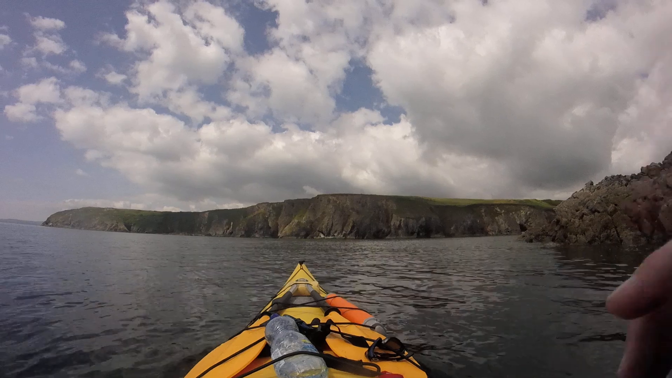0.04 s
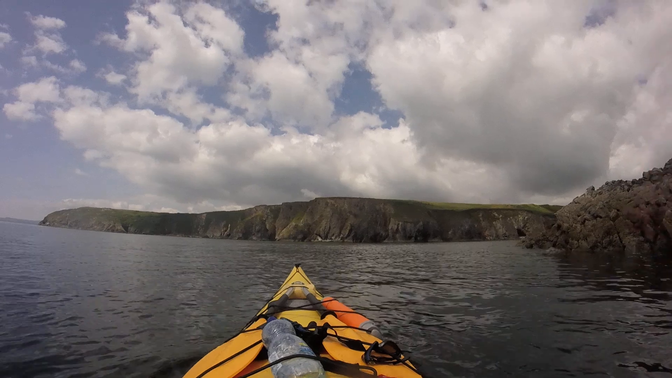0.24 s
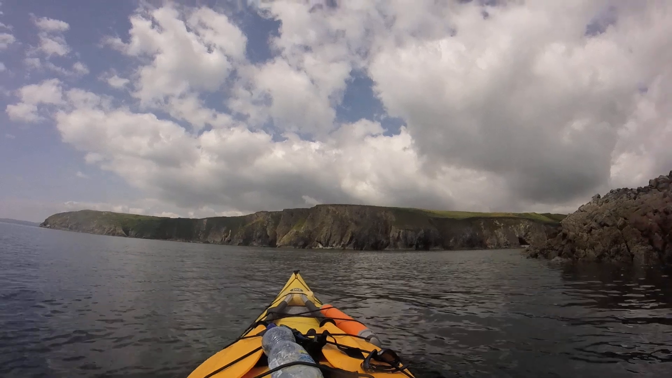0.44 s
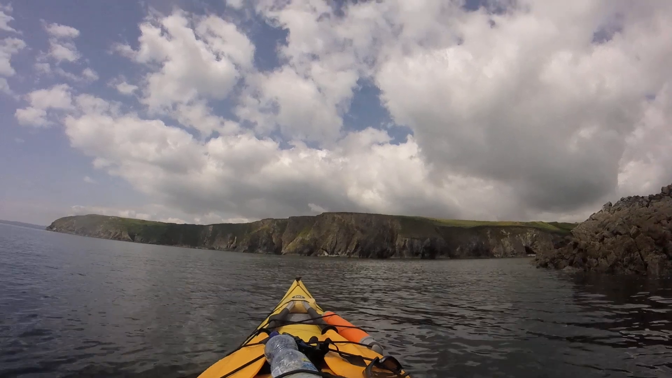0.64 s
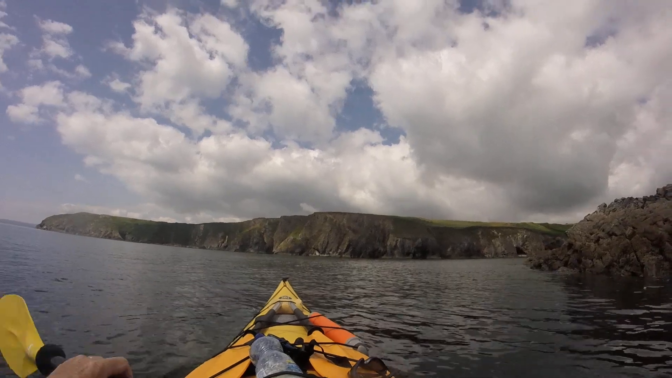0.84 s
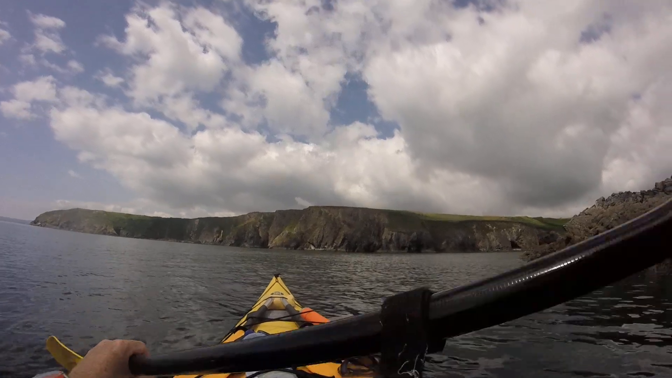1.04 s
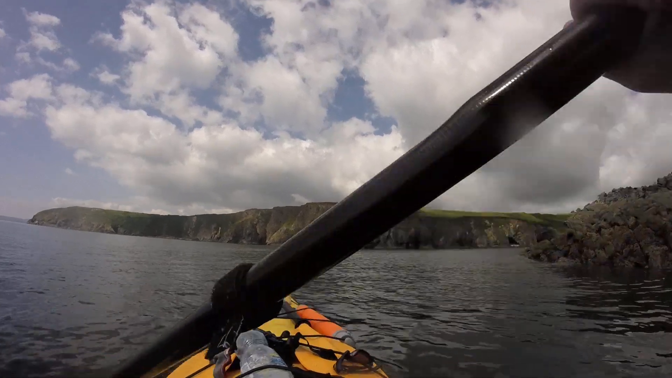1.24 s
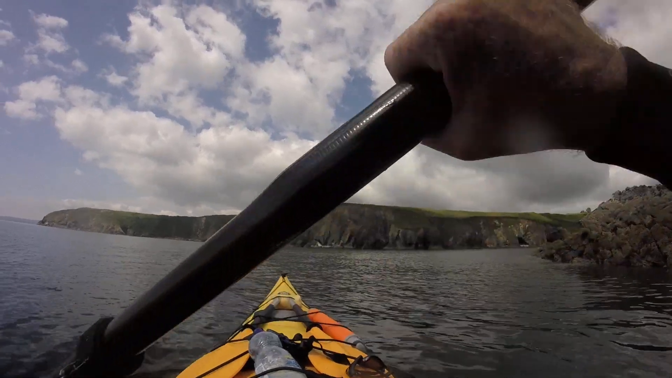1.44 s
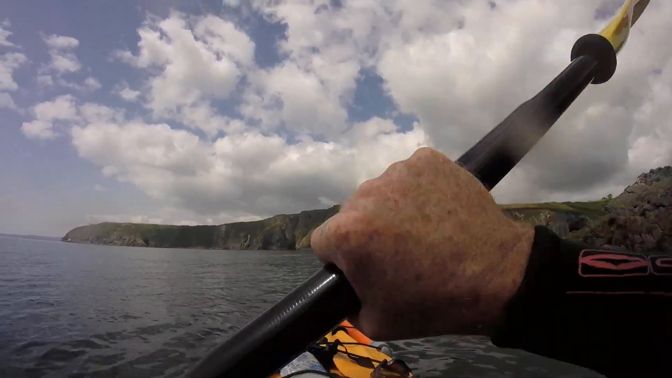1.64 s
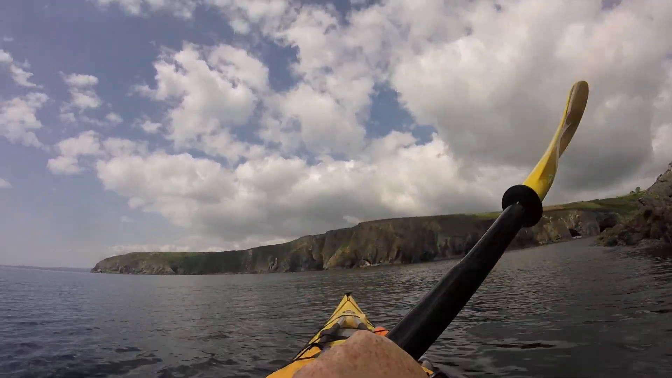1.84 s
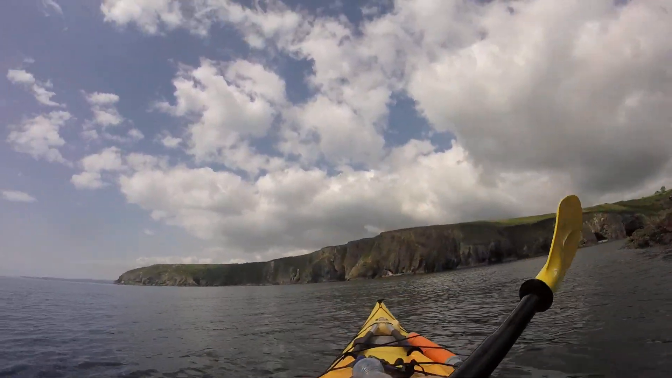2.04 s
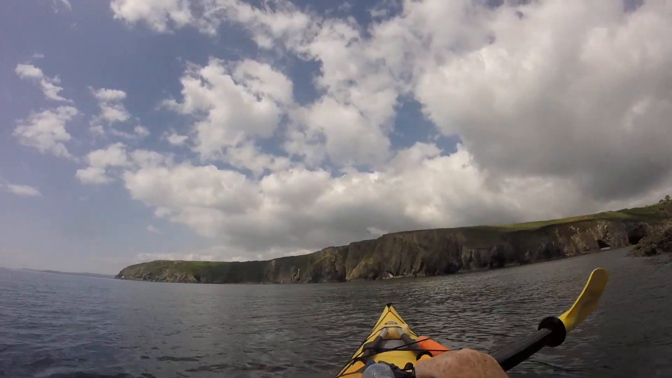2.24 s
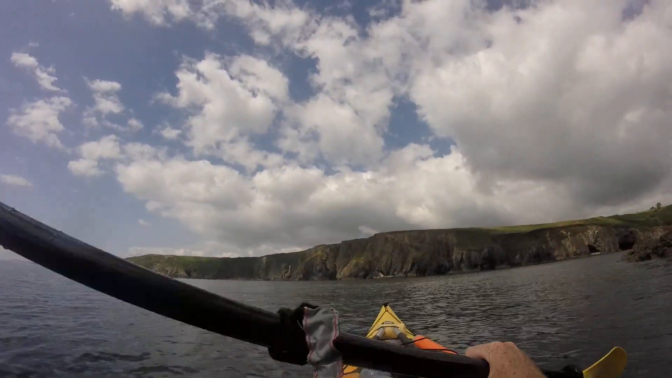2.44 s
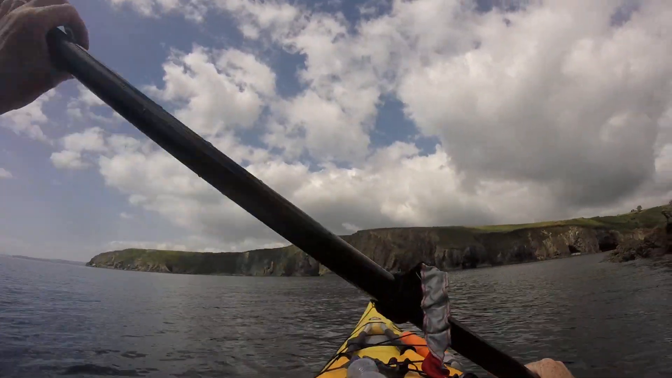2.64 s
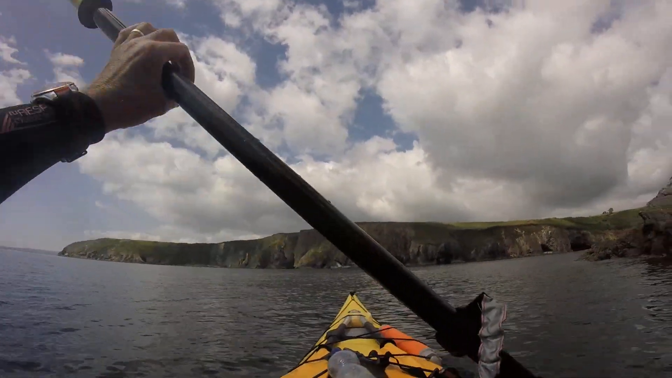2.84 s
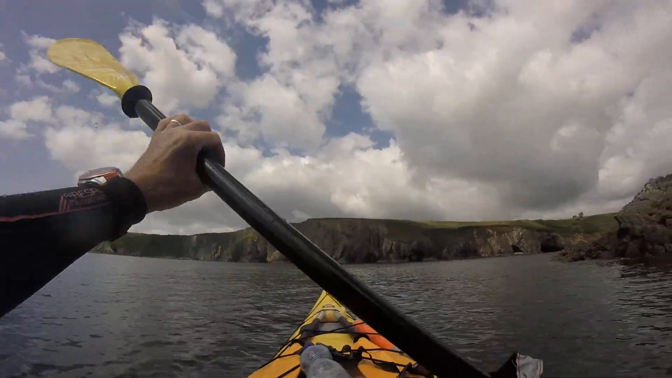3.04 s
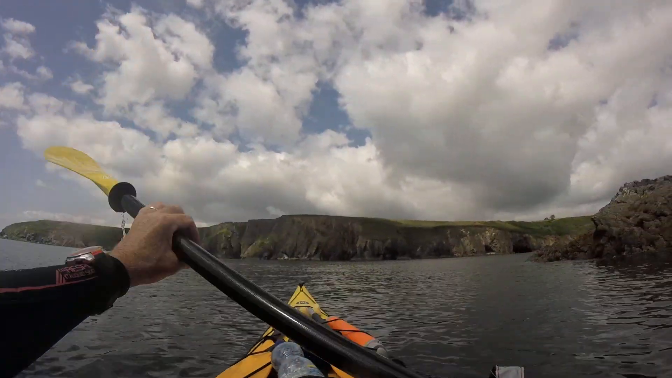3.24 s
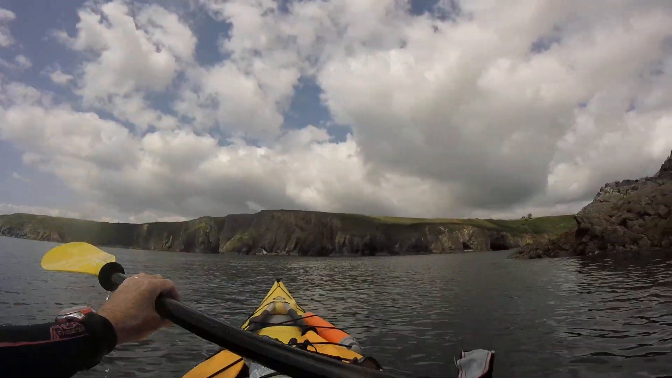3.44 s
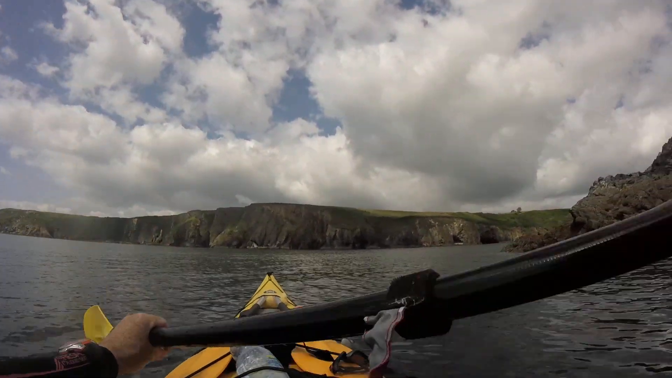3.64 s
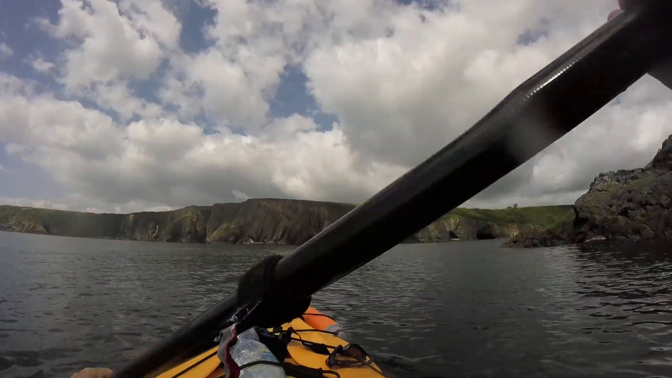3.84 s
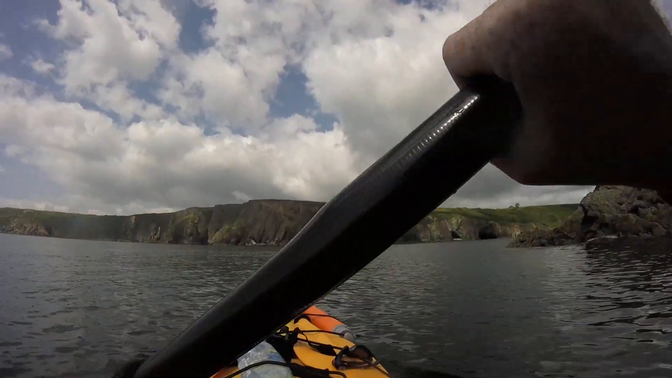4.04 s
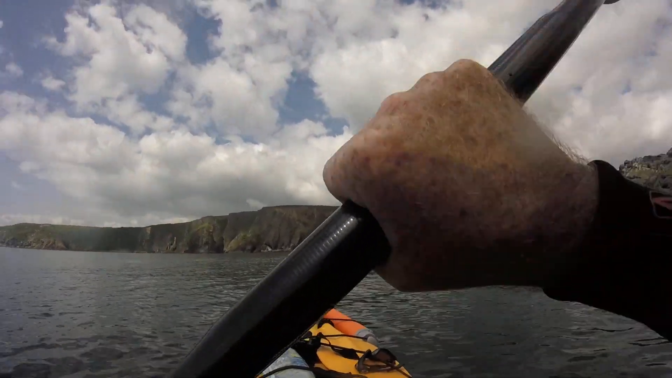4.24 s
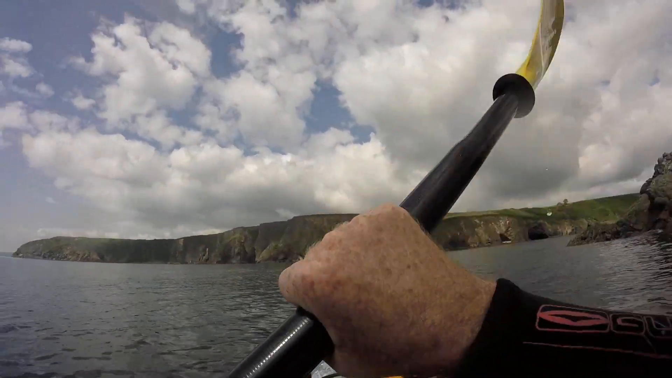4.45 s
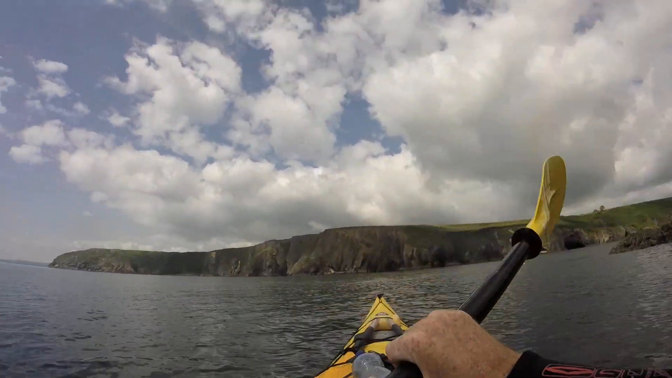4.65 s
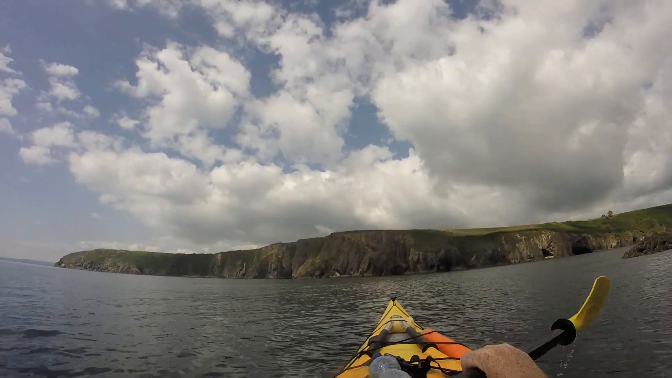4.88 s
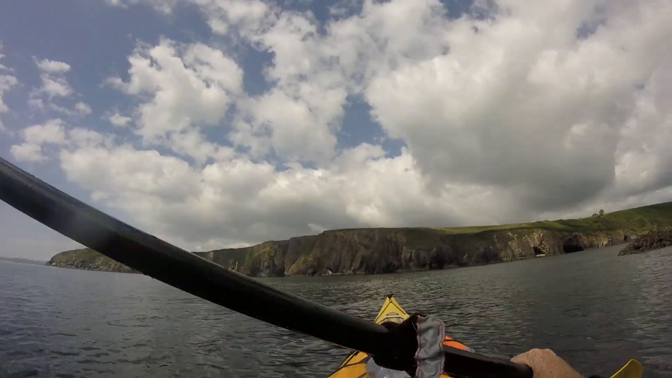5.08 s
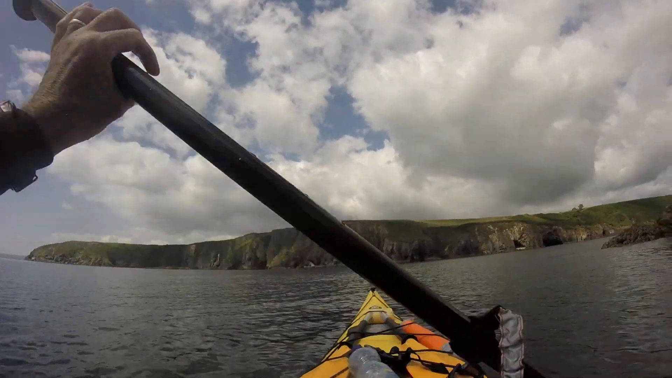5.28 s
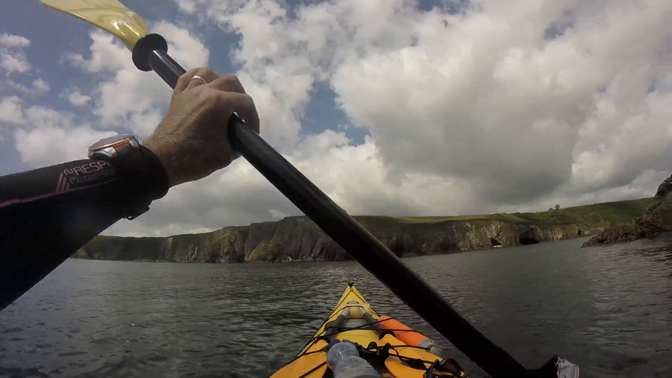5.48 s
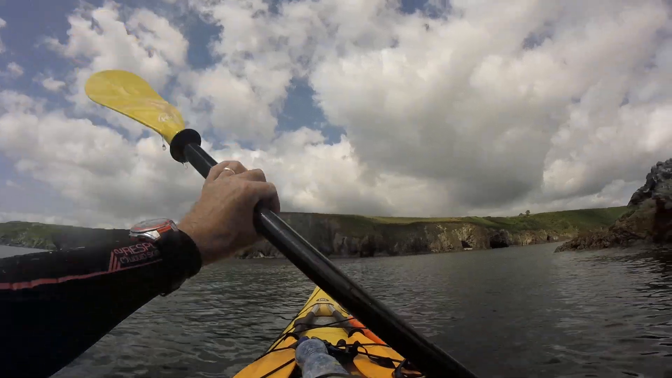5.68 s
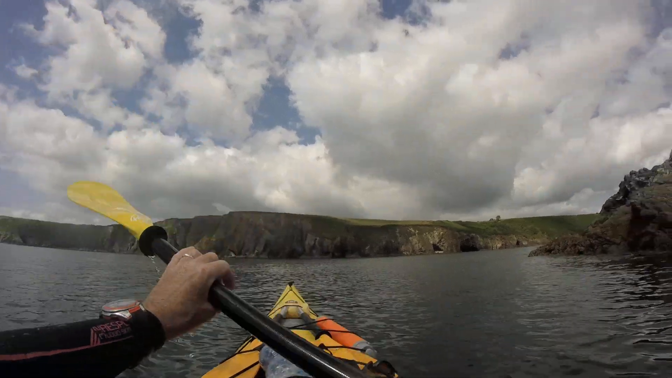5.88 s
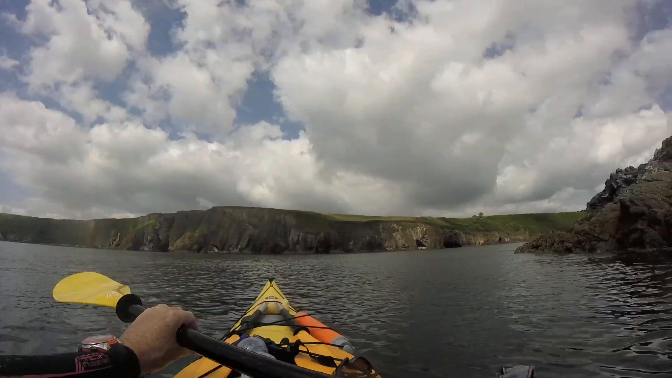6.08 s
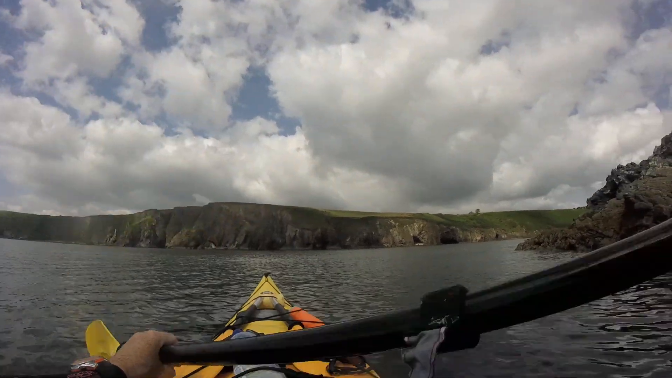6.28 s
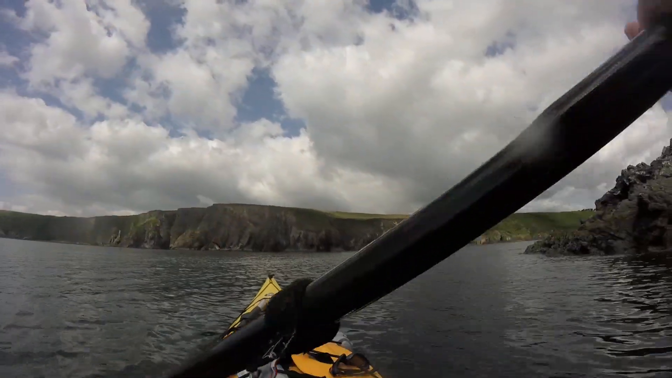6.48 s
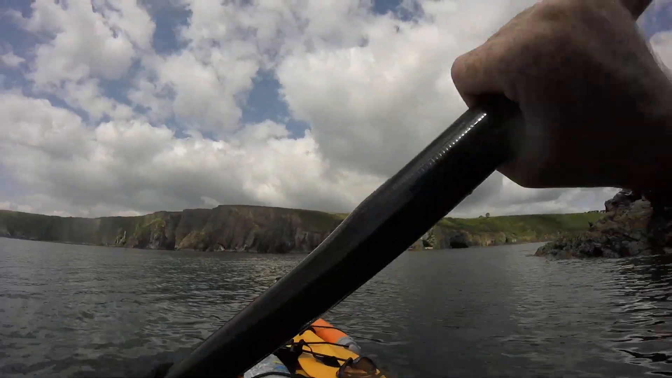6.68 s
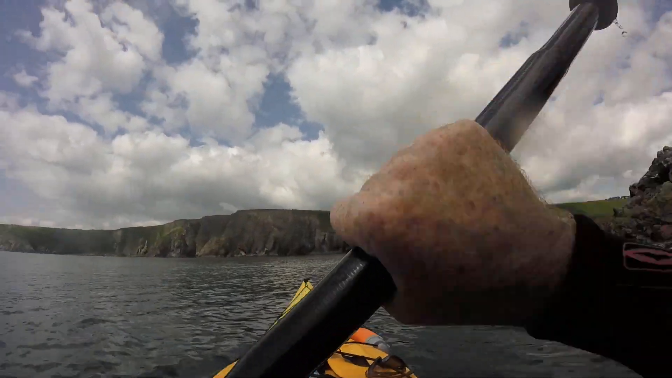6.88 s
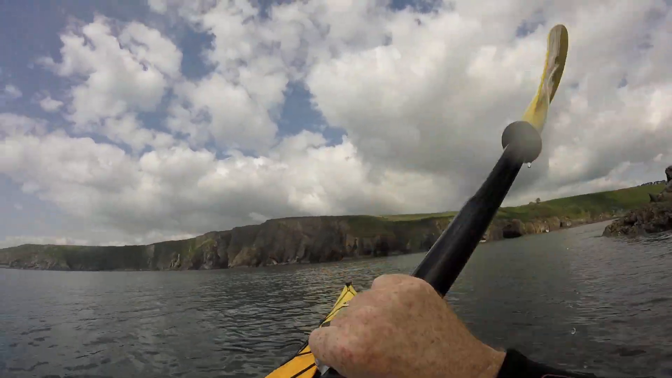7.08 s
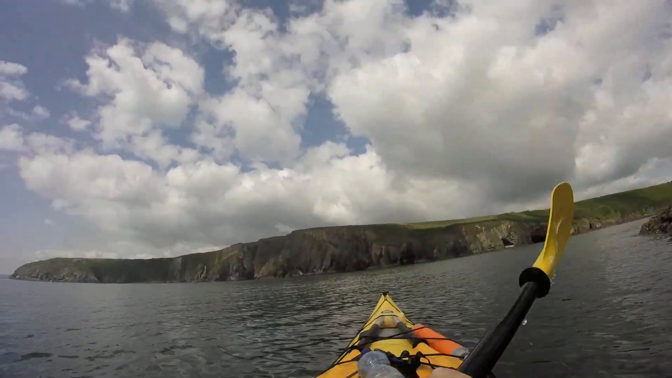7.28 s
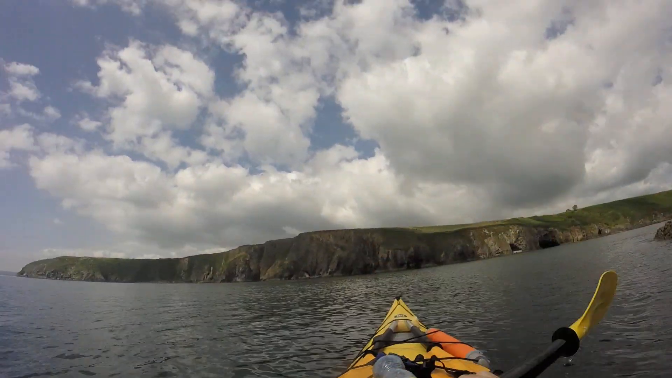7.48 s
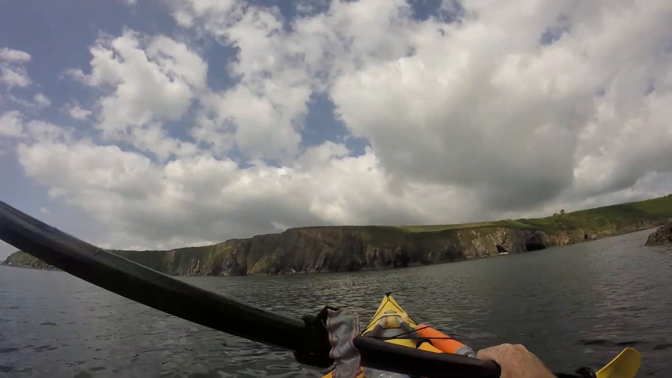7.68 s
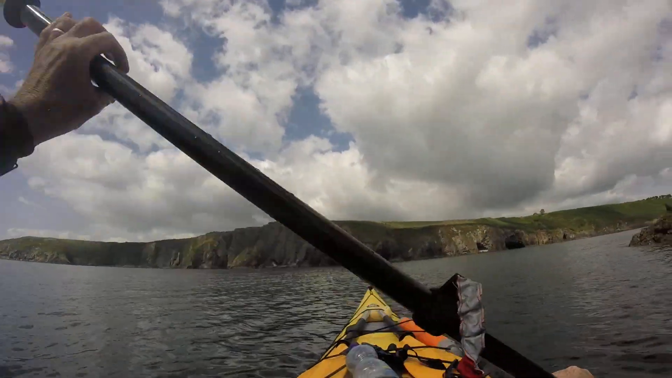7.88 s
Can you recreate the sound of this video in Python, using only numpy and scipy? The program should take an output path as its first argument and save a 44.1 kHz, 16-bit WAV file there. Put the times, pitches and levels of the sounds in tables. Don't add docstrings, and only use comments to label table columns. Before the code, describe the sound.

The sound opens after a tiny silence and fades in over the first second: soft hull wash, faint hiss and lumpy low wind rumble, heard through a sealed plastic case. Around 0.8 s a few hollow plastic knocks cluster together. A bright bubbly drip plops at about 1.25 s. From 1.8 to 2.3 s a paddle pull drags the strap in grainy rubbing with mount thrum and buckle jolts. Another follows at 3.0-3.5 s, with a solid knock near 3.2, then drips at 3.6 and a low hull slap at 4.0. Rubbing surges again at 4.4-4.7 s, eases with drips near 5.1, then returns in bumpy scrapes from 5.5 to 6.2. Drops tick and ripples slap lightly from 6.4 to 6.9 s. A strong scrape with knocks comes at 7.1-7.5 s, and a sharp plastic click with a ringing drip at 7.8 s before the end.

```python
import sys
import numpy as np
from scipy import signal
from scipy.fft import rfft, irfft, next_fast_len
from scipy.io import wavfile
from scipy.ndimage import uniform_filter1d, map_coordinates

SR = 44100
rng = np.random.default_rng(int(sys.argv[2]) if len(sys.argv) > 2 else 0)


def boost_factor(decibels):
    exponent = np.asarray(decibels, float) / 20
    return 10 ** exponent


def wav_record(signal):
    frames = np.transpose(np.atleast_2d(signal))
    bounded = np.clip(frames, -1, 1)
    quanta = np.round(bounded * 32767).astype(np.int16)
    wavfile.write(sys.argv[1], SR, quanta)


N = 349272

# [f/Hz, level/dB]
WASH_SPECTRUM = [(240, -22), (400, -3.5), (632, -3.5), (983, -8), (1130, -4.5), (1400, -15), (1580, -9),
                 (1840, -13), (2690, -10), (3430, -15.5), (9100, -26), (15300, -40.5)]
# [f/Hz, level/dB]
RUMBLE_SPECTRUM = [(8.8, -48), (15, -3.5), (112, 1.5), (157, -4), (231, -13.5), (299, -27.5), (700, -35),
                   (910, -27.5), (1540, -120)]
# [t/s, rumble level/dB]
LURCHES = [(.08, -48), (.78, -46.5), (1.15, -50), (1.41, -44), (1.94, -36.5), (2.25, -43.5), (2.53, -52),
           (2.82, -42.5), (3.13, -40.5), (3.55, -45), (4.01, -45), (4.28, -46), (4.65, -36.5), (4.95, -49),
           (5.6, -40.5), (5.87, -40.5), (6.15, -43.5), (6.4, -50), (6.65, -48), (6.9, -42.5), (7.17, -37.5),
           (7.45, -41), (7.9, -43)]
# [t/s, peak level/dB, push length/s]
SLAPS = [
    (2.78, -42, 0.0032),
    (3.553, -33, 0.0027),
    (4.012, -29.5, 0.0034),
    (6.381, -34, 0.0033),
    (6.41, -39.5, 0.0028),
    (6.713, -36.5, 0.0049),
    (6.905, -31, .002),
    (6.924, -32, .002),
]
# [t/s, peak level/dB, f/Hz, t60/s]
LARGE_DRIPS = [(1.07, -42, 1970, .02), (1.256, -22.5, 1500, 0.014), (1.6578, -36, 1700, .024),
               (3.6282, -37.5, 1510, 0.034), (3.818, -36, 1330, 0.017), (4.173, -40, 1380, 0.018),
               (4.223, -40.5, 1150, 0.041), (5.1437, -35.5, 1440, 0.011), (5.2167, -36.5, 1300, 0.027),
               (5.859, -31, 1392, 0.09), (6.5133, -35.5, 1410, 0.024), (6.522, -42, 1240, 0.029)]
# [t/s, peak level/dB, f/Hz, t60/s]
SMALL_DRIPS = [(1.256, -39.5, 2830, .028), (1.5766, -46, 3170, 0.021), (1.6387, -51, 2680, .03),
               (1.673, -46, 2900, 0.076), (2.6469, -42.5, 2750, .027), (2.691, -42, 2700, .039),
               (3.627, -31.5, 2530, 0.0099), (3.767, -46.5, 2570, 0.033), (4.1984, -46, 3120, .03),
               (4.2766, -43, 2490, .021), (5.0499, -46, 2630, 0.016), (5.215, -46, 2730, 0.035),
               (5.2355, -37, 2770, 0.017), (6.525, -40.5, 2850, .02), (7.829, -24, 2800, 0.012),
               (7.88, -39, 2730, 0.025)]
# [t/s, peak level/dB, f/Hz, length/s]
SHELL_DROPS = [(1.244, -46, 4140, 0.004), (1.2645, -49, 4260, 0.0079), (3.9534, -44.5, 5430, 0.0058),
               (4.246, -50, 5820, 0.012), (4.259, -50, 6000, 0.012), (4.272, -47, 6100, 0.0082),
               (5.111, -47.5, 5430, 0.0084), (5.216, -46, 4360, 0.0072), (5.3278, -52, 4380, 0.004),
               (5.5014, -50, 5400, 0.0071), (6.045, -45, 4220, 0.0088), (6.508, -56, 6100, 0.003),
               (6.5134, -44, 6200, 0.0071), (6.5226, -36.5, 5560, 0.0071), (6.8633, -50, 5520, 0.0045),
               (6.904, -45, 6000, 0.014), (7.833, -44, 4500, 0.0082)]
# [f/Hz, width/Hz, level/dB]
SPLASH_MODES = [(2800, 740, 1), (8700, 2500, -13.5), (11700, 4700, -15), (13400, 870, -62)]
# [f/Hz, width/Hz, level/dB]
HOUSING_MODES = [(808, 30, 2), (1200, 206, 6.5), (1411, 91, 12), (1688, 190, 0.5), (2007, 64, 3),
                 (2253, 118, 1.5), (2730, 156, 5), (3280, 400, -9.5), (3868, 122, -7.5), (5390, 340, -12.5),
                 (7110, 230, -22), (9100, 340, -33.5)]
# [f/Hz, width/Hz, level/dB]
MOUNT_MODES = [(187.6, 83.3, -0.5), (260.6, 85, 1), (365.5, 111, -5.5)]
# [t/s, hollow peak level/dB, upper ring level/dB, edge ring level/dB, length/s]
KNOCKS = [(.804, -23.5, -12, -23, 0.0036), (0.8241, -25.5, -2, -25, .004), (0.8273, -30, 6.5, -8.5, 0.0067),
          (.8924, -44, 5, -31, 0.0022), (1.26, -30, -16, -23, 0.0062), (1.7608, -20, -1, -37, 0.0018),
          (3.161, -14, -5.5, -8.5, 0.0026), (3.262, -28.5, 0, -14, 0.0015), (4.2665, -32, -15, -26, 0.0066),
          (6.891, -35.5, -0.5, -16, 0.0066), (7.1803, -17.5, -25, -37, 0.0036),
          (7.828, -48.5, 10.5, 3, .0056)]
# [t/s, hollow peak level/dB, upper ring level/dB, length/s]
JOLTS = [(1.933, -29, -14, 0.011), (2.114, -26, -4, 0.0055), (2.246, -34, -7, 0.0068),
         (2.676, -35, -5.5, 0.0076), (4.528, -25, -15, 0.0083), (4.6032, -21, -12, 0.0099),
         (4.646, -32.5, -4, 0.0047), (5.049, -42.5, -5, .003), (5.145, -46, -8, 0.0033),
         (5.555, -36.5, -4, 0.004), (5.642, -29, 0, 0.0051), (5.659, -35, 7.5, 0.004),
         (5.76, -32.5, -22, 0.0049), (5.988, -31.5, -8, .0049), (6.079, -45, -16, 0.0023),
         (7.127, -29.5, -7, .006), (7.4, -32, 0, .007), (7.442, -31, 2, 0.0032), (7.66, -37, -4.5, 0.02)]
KNOCK_CORNERS_HZ = [900, 2200, 2970, 5540]
# [t/s, level/dB]
STRAP_REST = [(0, -58.5), (.55, -61), (.9, -56.5), (1.5, -56), (2.45, -55.5), (3.0, -58), (3.7, -54.5),
              (4.1, -59), (4.9, -52), (5.15, -66), (5.4, -54.5), (6.2, -59.5), (6.45, -63), (6.8, -57.5),
              (7.0, -53.5), (7.75, -56), (7.92, -57)]
# [t/s, hold/s, rub level/dB, mount thrum over rub level/dB]
STRAP_TUGS = [(.62, 0, -59, -8), (0.722, 0.11, -56, 4.5), (1.14, 0.019, -54, -2),
              (1.668, 0.083, -54.5, 7.5), (1.885, 0.14, -42.5, 3.5), (2.11, 0, -41.5, 5),
              (2.211, 0.028, -45, 0.5), (2.77, 0.025, -50.5, 1), (2.96, 0.022, -53, 11),
              (3.07, 0.082, -45.5, 0.5), (3.258, 0, -40, 4.5), (3.435, 0.094, -45.5, 3),
              (4.26, 0.022, -51.5, -8), (4.455, 0.069, -43.5, 5), (4.576, 0.15, -39.5, 2),
              (4.806, 0.028, -51, 7), (5.23, 0.079, -54.5, 1.5), (5.54, 0.024, -48, 4),
              (5.638, 0.027, -42.5, 5.5), (5.77, 0.024, -44, 5.5), (5.879, 0, -38, 2.5),
              (5.952, .15, -46, 2.5), (6.192, 0.028, -46, 1.5), (6.35, 0, -51, -5), (6.64, 0.012, -51, 4.5),
              (7.075, .05, -49, 6.5), (7.166, 0.094, -38.5, 0.5), (7.26, 0.12, -44, 2),
              (7.454, 0.059, -41, -1.5), (7.598, 0.094, -50.5, -8)]


def unit(x):
    return x / np.sqrt(np.mean(x ** 2) + 1e-20)


def curves(rows):
    t_s, *columns = np.transpose(rows)
    return [np.interp(np.arange(N) / SR, t_s, column) for column in columns]


def wobble(rate_hz):
    knots = rng.standard_normal(int(N * rate_hz / SR) + 4)
    return map_coordinates(knots, [np.arange(N) * rate_hz / SR])


def filtered(x, response):
    size = next_fast_len(N + SR // 2)
    return irfft(rfft(x, size) * response(np.fft.rfftfreq(size, 1 / SR)), size)[:N]


def ringing(x, response):
    y = irfft(rfft(x) * response(np.fft.rfftfreq(len(x), 1 / SR)), len(x))
    return y / np.max(np.abs(y))


def colour(points):
    f_hz, level_db = np.transpose(points)
    return lambda hz: boost_factor(np.interp(np.log(hz + 1), np.log(f_hz + 1), level_db, -120, -120))


def resonance(f, centre_hz, width_hz, level_db):
    loss = 1j * f * width_hz
    return boost_factor(level_db) * loss / (centre_hz * centre_hz - f * f + loss)


def body(modes):
    return lambda f: sum((-1) ** k * resonance(f, *mode) for k, mode in enumerate(modes))


def damped(response, corner_hz):
    return lambda f: response(f) / (1 + 1j * f / corner_hz) ** 2


def slips(rate_hz, spread_db, grit):
    draw = rng.random((2, N))
    size = boost_factor(-spread_db * np.log(1 - draw[1]))
    jerks = (draw[0] < rate_hz / SR) * size * rng.standard_normal(N)
    return np.sqrt(grit) * unit(jerks) + np.sqrt(1 - grit) * rng.standard_normal(N)


def burst(length_s):
    t = np.arange(4096) / SR
    fall_s = max(length_s, 1e-3)
    z = rfft(rng.standard_normal(len(t)) * boost_factor(-20 * t / fall_s))
    even = irfft(z / np.sqrt(np.abs(z) * np.mean(np.abs(z))), len(t))
    build_up_s = max(0.27 * length_s, 1e-4)
    return even * boost_factor(-10 * t / fall_s) * (1 - np.exp(-t / build_up_s))


def add(track, t_s, sound):
    start = round(t_s * SR)
    track[start:start + len(sound)] += sound[:N - start]


def swells(starts_s, holds_s, peaks_db, under_db, rise_db_s, fall_db_s):
    step = 64
    t = np.arange(0, N + step, step) / SR
    late_s = t - np.asarray(starts_s)[:, None]
    before_s = np.clip(-late_s, 0, None)
    after_s = np.clip(late_s - np.abs(holds_s)[:, None], 0, None)
    level_db = np.asarray(peaks_db)[:, None] - (rise_db_s * before_s + fall_db_s * after_s)
    power = np.sum(boost_factor(2 * level_db), axis=0)
    return 10 * np.log10(np.interp(np.arange(N) / SR, t, power) + boost_factor(2 * under_db))


def strap():
    t_s, hold_s, peak_db, thrum_db = np.transpose(STRAP_TUGS)
    rest_db, = curves(STRAP_REST)
    rates = dict(rise_db_s=156, fall_db_s=175)
    rub_db = swells(t_s, hold_s, peak_db, rest_db, **rates)
    mount_db = swells(t_s, hold_s, peak_db + thrum_db, rest_db + 2, **rates)
    pull_db = uniform_filter1d(rub_db, size=SR // 4) - np.median(rub_db)
    return rub_db, mount_db, pull_db


def wash():
    rest_db, swell_per_pull_db = -69, 0.0857
    level_db = rest_db + swell_per_pull_db * strap()[2]
    noise = filtered(slips(2500, spread_db=1.5, grit=.3), colour(WASH_SPECTRUM))
    top = filtered(noise, lambda f: (f > 4500) & (f < 12000))
    return boost_factor(level_db + .4 * wobble(10)) * noise / np.std(top)


def wind():
    t_s, peak_db = np.transpose(LURCHES)
    level_db = swells(t_s, 0 * t_s, peak_db, under_db=-51.5, rise_db_s=56, fall_db_s=55)
    rumble = filtered(rng.standard_normal(N), colour(RUMBLE_SPECTRUM))
    return boost_factor(level_db) * unit(boost_factor(0.28 * wobble(25)) * rumble)


def slaps():
    out, t = np.zeros(N), np.arange(SR // 20) / SR
    for t_s, peak_db, length_s in SLAPS:
        u = t / length_s
        add(out, t_s, -boost_factor(peak_db + 5) * u * (2.4 - u) * np.exp(-u))
    return out


def fizz():
    out, t = np.zeros(N), np.arange(SR // 25) / SR
    rub_db = strap()[0]
    for when, pitch, size in rng.random((500, 3)):
        f_hz = 1000 * 3.6 ** pitch
        level_db = rub_db[int(when * N)] - 7.0 - 3 * np.log(1 - size) - 7 * pitch
        cycles = f_hz * t * (1 + 4 * t)
        envelope = boost_factor(level_db - 60 * cycles / 40) * (1 - np.exp(-cycles / 1.4))
        add(out, when * N / SR, envelope * np.sin(2 * np.pi * cycles))
    return out


def drips():
    out, t = np.zeros(N), np.arange(SR // 10) / SR
    for t_s, peak_db, f_hz, t60_s in LARGE_DRIPS + SMALL_DRIPS:
        cycles = f_hz * (t + 0.15 * (t * t / t60_s - 0.18 * t))
        envelope = boost_factor(peak_db + 1.5 - 60 * t / t60_s) * (1 - np.exp(-t / 0.00078))
        add(out, t_s, envelope * np.sin(2 * np.pi * cycles))
    return out


def drop_response(f_hz):
    splash, pitch = body(SPLASH_MODES), body([(f_hz, 900, 0)])

    def response(f):
        tick = splash(f) + boost_factor(-1.5) * pitch(f) ** 2
        return tick * (1j * f / (1j * f + 4000)) ** 2 / (1 + (f / 12000) ** 6)
    return response


def drops():
    out = np.zeros(N)
    for t_s, peak_db, f_hz, length_s in SHELL_DROPS:
        add(out, t_s, boost_factor(peak_db) * ringing(burst(length_s), drop_response(f_hz)))
    return out


def knocks():
    out = np.zeros(N)
    blows = [(*row, 1.4) for row in KNOCKS]
    for t_s, peak_db, upper_db, length_s in JOLTS:
        blows.append((t_s, peak_db, upper_db, -21 + 0.54 * upper_db, length_s, 1.14))
    for t_s, peak_db, upper_db, edge_db, length_s, grip in sorted(blows):
        held = [(f_hz, grip * width_hz, db) for f_hz, width_hz, db in MOUNT_MODES + HOUSING_MODES]
        families = [held[:3], held[4:7], held[7:11], held[11:]]
        thud_db = -4 + np.clip(upper_db, -15, 0)
        blow = burst(length_s)
        for modes, corner_hz, db in zip(families, KNOCK_CORNERS_HZ, [thud_db, -1, upper_db, edge_db]):
            add(out, t_s, boost_factor(peak_db + db) * ringing(blow, damped(body(modes), corner_hz)))
    return out


def rub():
    housing_db, mount_db, pull_db = strap()
    stroke_s, left_pull_s = 1.36, 2.23
    rock = np.cos(np.pi * (np.arange(N) / SR - left_pull_s) / stroke_s)
    lean_db = 0.5 * rock + 0.24 * pull_db
    surge = wobble(45)
    force = slips(1500, spread_db=2.5, grit=.35)
    families = [HOUSING_MODES[:2], HOUSING_MODES[2:4], HOUSING_MODES[4:8], HOUSING_MODES[8:]]
    housing = np.zeros(N)
    for modes, weight_db in zip(families, [.5 * lean_db, -.5 * lean_db, 0, 0]):
        wander_db = 1.2 * surge + 1.2 * wobble(55) + weight_db
        housing += boost_factor(wander_db) * filtered(force, damped(body(modes), corner_hz=6000))
    drag = slips(400, spread_db=1.5, grit=.4) + .4 * force
    thrum = filtered(drag, damped(body(MOUNT_MODES), corner_hz=1200))
    thrum = boost_factor(.7 * surge + .8 * wobble(30)) * thrum
    return boost_factor(housing_db) * unit(housing) + boost_factor(mount_db) * unit(thrum)


def scene():
    background = wash() + wind() + slaps()
    water = fizz() + drips() + drops()
    return (background + water + knocks() + rub())[None]


def sparse_top(x, from_hz, to_hz, kept, line_db):
    f_hz, _, z = signal.stft(x, SR, nperseg=2048)
    size = np.abs(z) + 1e-12
    threshold = np.quantile(size, 1 - kept, axis=-1, keepdims=True)
    steps = np.floor(np.sqrt(size / threshold))
    coarse = boost_factor(line_db) * steps ** 2 * z / size
    z = np.where(f_hz[:, None] > from_hz, coarse, z) * (f_hz[:, None] < to_hz)
    return signal.istft(z, SR, nperseg=2048)[1][..., :N]


def top_cut(x):
    return signal.sosfilt(signal.butter(12, 15430, fs=SR, output="sos"), x)


def record(dry):
    t = np.arange(N) / SR
    start_s, fade_s, fade_db = .045, 0.94, -19
    opening = (t > start_s) * boost_factor(fade_db * np.clip(1 - t / fade_s, 0, 1))
    mix = sparse_top(dry * opening, from_hz=12800, to_hz=15290, kept=.24, line_db=-101)
    return top_cut(mix)


dry = scene()
out = record(dry)
wav_record(out)
```